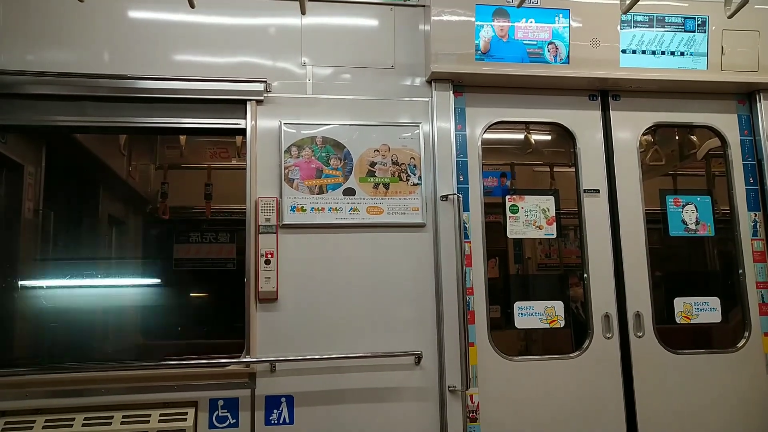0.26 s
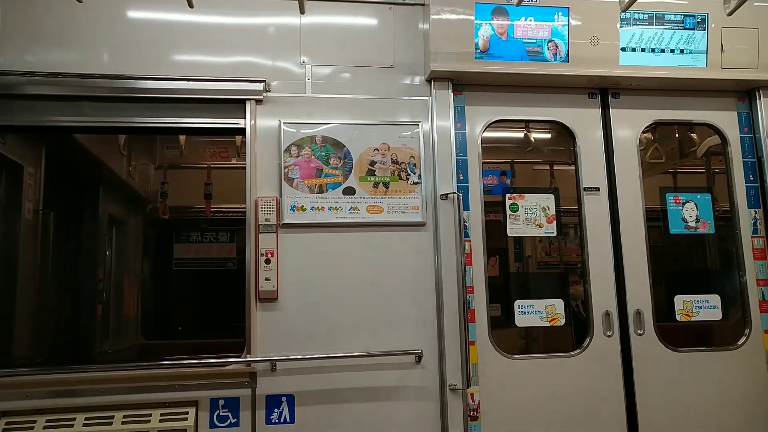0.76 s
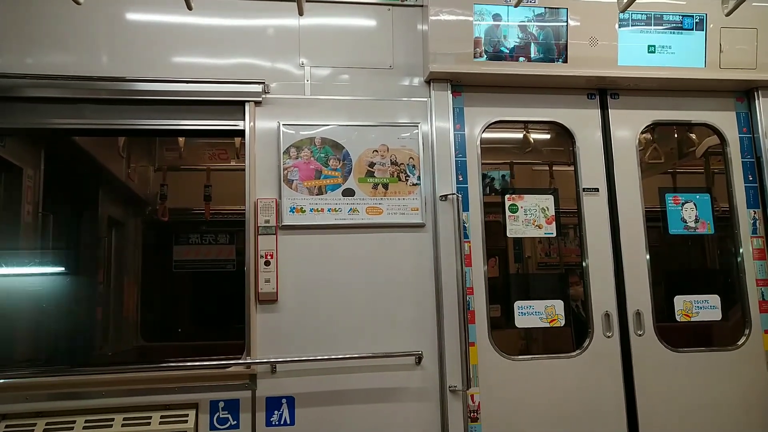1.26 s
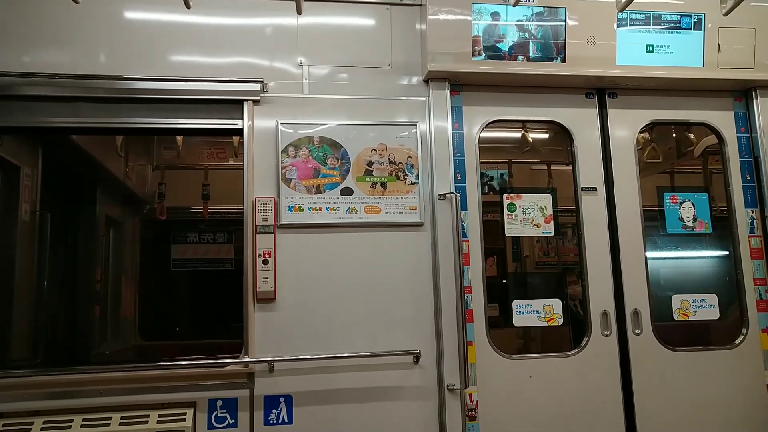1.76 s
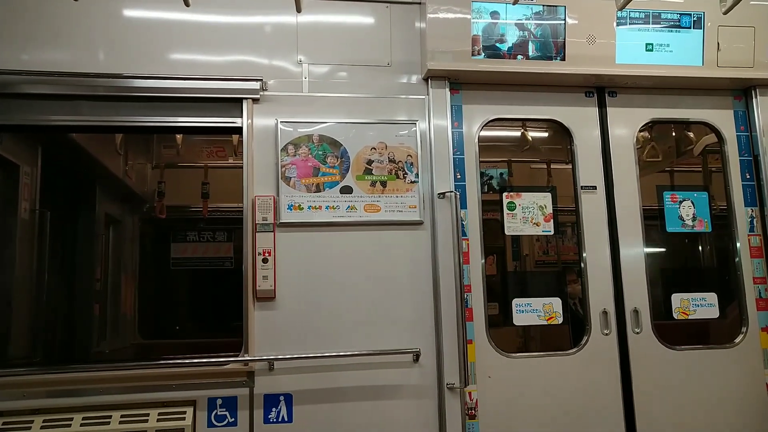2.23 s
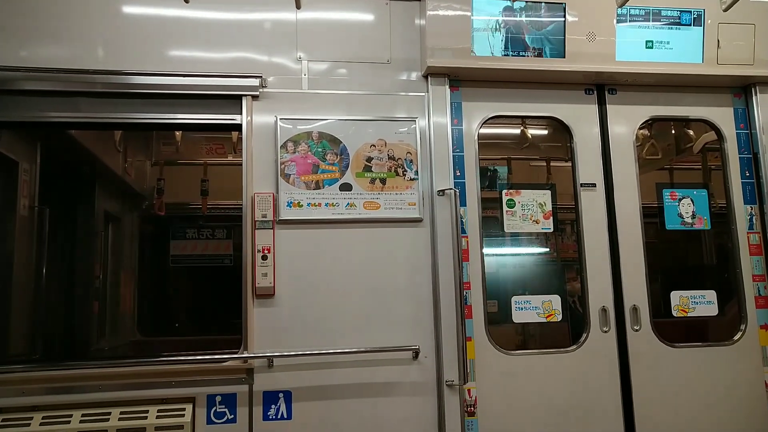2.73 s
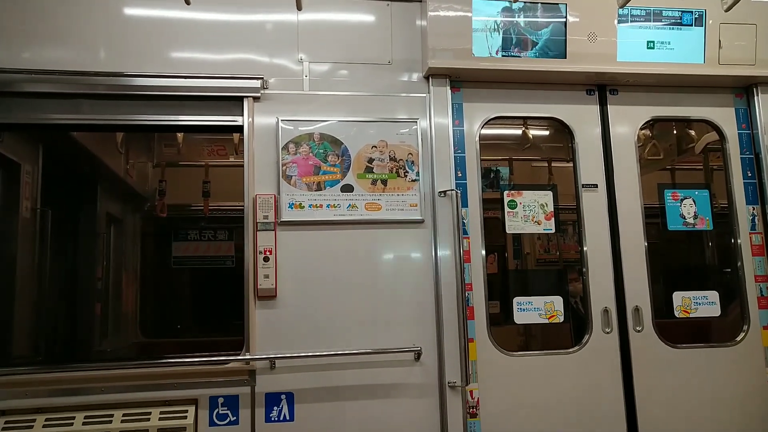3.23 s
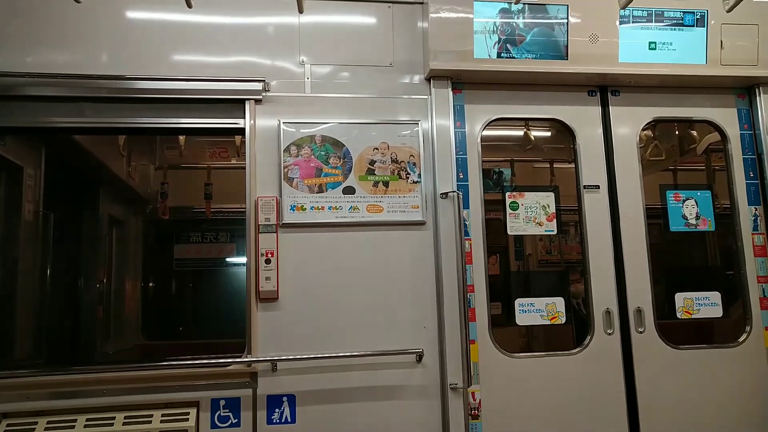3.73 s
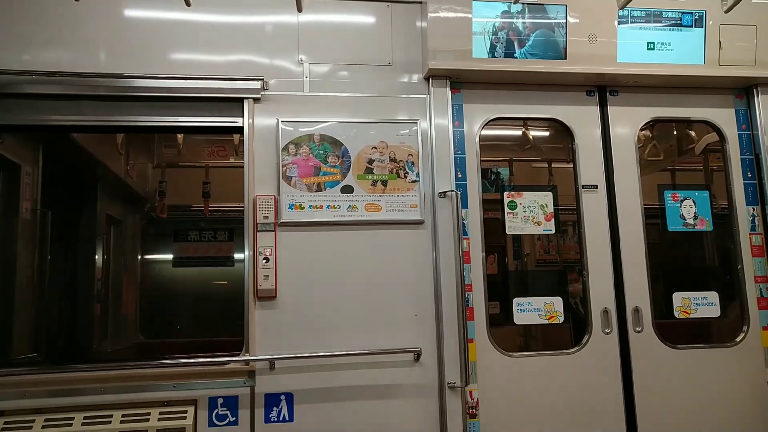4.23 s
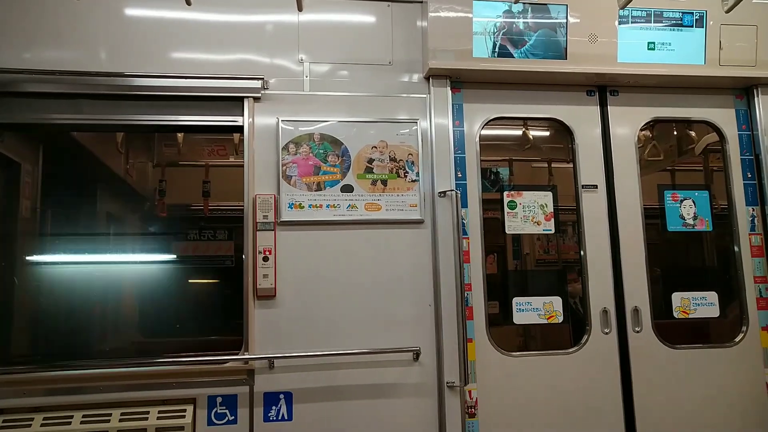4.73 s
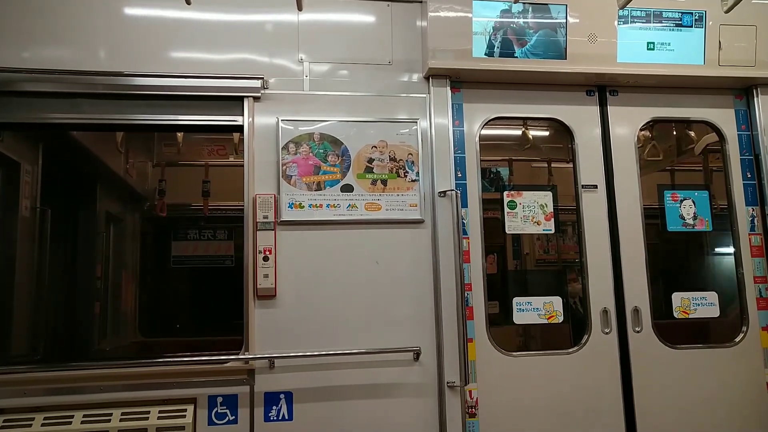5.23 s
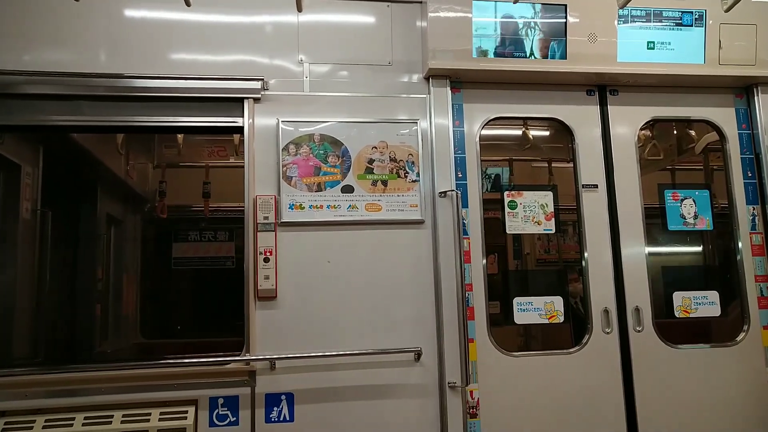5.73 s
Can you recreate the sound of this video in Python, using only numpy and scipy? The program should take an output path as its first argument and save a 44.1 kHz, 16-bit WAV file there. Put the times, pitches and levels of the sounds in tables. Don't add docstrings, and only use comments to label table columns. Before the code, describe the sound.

The interior of an electric train car running through a tunnel, with a continuous dense rumble from start to finish. The opening is rough: floor and panels shake, with dull thumps in the first 0.2 seconds. Then the roll eases, with low boom swelling irregularly, wavering hums from rippled rail, and a broad metallic wheel whir with a faint, drifting ring. Thin tunnel air hisses past the door seals. Scattered soft knocks come around 1.3, 1.9, 2.8 and 3.5 seconds, and a deep body sway swells near 3.6. After about 4.3 the wheel ringing dulls as the car leans into a curve. From 4.8 thumps crowd together, strongest near 5.2, and rattle on to about 5.45. From 5 seconds a wheel flange rubs with a mid-high scraping tone and very faint higher singing. The rumble then eases slightly but continues to the end at 6 seconds. Close, enclosed, small-microphone sound.

```python
import sys
import numpy as np
from scipy import signal
from scipy.fft import rfft, irfft, next_fast_len
from scipy.io import wavfile
from scipy.ndimage import uniform_filter1d

SR = 44100
rng = np.random.default_rng(int(sys.argv[2]) if len(sys.argv) > 2 else 0)


def invert_db(level):
    return 10 ** (np.asarray(level, dtype=float) / 20)


def generate_wav(sig):
    pcm = np.round(np.clip(np.atleast_2d(sig).T, -1, 1) * 32767).astype(np.int16)
    wavfile.write(sys.argv[1], SR, pcm)


N = 263718
T = np.arange(N) / SR

# t/s, excess level/dB
TRACK = [(0, 3), (.2, 3), (.6, 2), (.9, 0), (1.3, 1.5), (2.1, .5), (2.5, 1), (3.5, -0.5), (4.1, 0.5),
         (4.5, 0), (4.7, 0.5), (4.9, 1), (5.07, 2), (5.3, 4), (5.5, 3), (5.7, 1.5), (5.98, 1)]


def rms_one(x):
    return x / np.sqrt(np.mean(x ** 2) + 1e-20)


def in_time(rows):
    inertia_s = 0.13
    s, *columns = np.transpose(rows)
    return [uniform_filter1d(np.interp(T, s, column), round(inertia_s * SR)) for column in columns]


def ramp(start_s, rise_s):
    return np.sin(np.pi / 2 * np.clip((T - start_s) / rise_s, 0, 1)) ** 2


def coloured(spectrum, modes):
    size = next_fast_len(N)
    hz = np.arange(1, size // 2 + 2) * SR / size
    power = np.zeros(len(hz))
    if len(spectrum):
        points_hz, points_db = np.transpose(spectrum)
        colour_db = np.interp(np.log(hz), np.log(points_hz), points_db, left=-150, right=-150)
        power += invert_db(colour_db) ** 2
    for centre_hz, width_hz, db in modes:
        power += invert_db(db) ** 2 / (1 + ((hz - centre_hz) / width_hz) ** 2 * 2) ** 2
    white = rfft(rng.standard_normal(size))
    return rms_one(irfft(white * np.sqrt(power), size)[:N])


def slow_noise(rate_hz):
    lowpass = signal.butter(2, rate_hz, fs=SR, output="sos")
    return rms_one(signal.sosfilt(lowpass, rng.standard_normal(N + SR))[SR:])


def flicker(db, rate_hz):
    return invert_db(db * slow_noise(rate_hz))


def steadied(x):
    window, share = round(0.084 * SR), 0.53
    power = uniform_filter1d(uniform_filter1d(x ** 2, window), window)
    return rms_one(x / np.maximum(power, 1e-3) ** (share / 2))


def moving_band(pitch_hz, centre_hz, half_width_hz):
    phase = 2 * np.pi * np.cumsum(pitch_hz) / SR
    wobble = [coloured([], [(centre_hz, half_width_hz, 0)]) for part in range(2)]
    return wobble[0] * np.sin(phase) + wobble[1] * np.cos(phase)


def rolling():
    # f/Hz, level per Hz/dB
    floor_colour = [(90, -31.5), (125, -11), (150, -5.5), (200, -13), (228, -19), (280, -28.5)]
    panel_colour = [(170, -41), (220, -13.5), (260, -4.5), (400, -10), (520, -10), (620, -18.5), (800, -31)]
    rail_colour = [(450, -29), (600, -6.5), (780, -7), (1000, -8), (1250, -13), (1600, -20.5),
                   (2200, -33.5)]
    # f/Hz, width/Hz, level per Hz/dB
    floor_modes = [(168, 62, -11), (190, 4, -7), (210, 25, -10.5)]
    panel_modes = [(268, 36, -5.5), (292, 37, -7), (331.5, 29, -6), (374.4, 12, -7), (486, 35, -14.5),
                   (569, 31, -13.5)]
    rail_modes = [(699, 12, -5), (734, 25, -7), (820, 18, -2.5), (880, 27, -4), (931, 72, -6),
                  (998, 27, -10), (1080, 23, -11)]
    track_db, = in_time(TRACK)
    floor = invert_db(-31 + 0.46 * track_db) * steadied(coloured(floor_colour, floor_modes))
    panels = invert_db(-30 + 0.97 * track_db) * steadied(coloured(panel_colour, panel_modes))
    rail = invert_db(-34.5 + 0.43 * track_db) * coloured(rail_colour, rail_modes) * flicker(0.32, 3.0)
    return floor + panels + rail


def wheels():
    # f/Hz, level per Hz/dB
    roar_colour = [(1100, -13.5), (1450, -14), (2000, -8.5), (2600, -13.5), (2900, -17.5), (3500, -22.5),
                   (4400, -32), (6000, -57)]
    # f/Hz, width/Hz, level per Hz/dB
    roar_modes = [(1815, 150, -8), (3104, 160, -19), (4020, 300, -26.5)]
    main_mode = [(2240, 150, 1), (2386, 150, 2.5), (2513, 82, -1)]
    growth_db_per_s, lean_damping_db = 0.25, 2.5
    lean = ramp(4.3, 0.6)
    mode_db = -41 + growth_db_per_s * T - lean_damping_db * lean
    roar = invert_db(-38.5) * coloured(roar_colour, roar_modes)
    return roar + invert_db(mode_db) * coloured([], main_mode) * flicker(0.36, 29)


def underframe():
    # f/Hz, level per Hz/dB
    boom_colour = [(40, -28), (60, -4.5), (80, 0.5), (110, 3), (130, -2), (160, -20.5)]
    # t/s, added level/dB
    sways = [(.24, 8), (.87, 4), (1.17, 3), (1.68, 8), (3.3, 9), (5.17, 7), (5.8, 6), (1.92, -5), (4.3, -4),
             (4.46, -5), (3.65, 15), (3.8, 2), (4.13, 9), (4.9, 10.5), (5.3, 2)]
    sway_s = 0.053
    track_db, = in_time(TRACK)
    sway_db = sum(db * np.exp(-((T - s) / sway_s) ** 2) for s, db in sways)
    heave = invert_db(-52.5 + 0.1 * track_db + sway_db) * coloured([], [(49.7, 17, 0)])
    boom = invert_db(-36.5 + 0.89 * track_db + 0.53 * sway_db) * steadied(coloured(boom_colour, []))
    return heave + boom


def wheel_beat():
    turn_hz, wear_db, high_spot_s = 7.3, 0.2, 0.013
    return invert_db(wear_db * np.cos(2 * np.pi * turn_hz * (T - high_spot_s)))


def thumps(blows):
    rise_s, t60_s = 0.005, 0.061
    out, t = np.zeros(N), np.arange(SR // 4) / SR
    rattle_band = signal.butter(4, [300, 950], "band", fs=SR, output="sos")
    rattles = signal.sosfilt(rattle_band, rng.standard_normal((len(blows), len(t))))
    swell = (1 - np.exp(-t / rise_s)) * invert_db(-60 * t / t60_s)
    for (s, db, hz), rattle in zip(blows, rattles):
        blow = invert_db(db - 2.5) * swell * (np.sin(2 * np.pi * hz * t) + invert_db(2.0) * rattle)
        at = round(s * SR)
        out[at:at + len(t)] += blow[:N - at]
    return out


def rail_blows():
    # t/s, peak level/dB, floor pitch f/Hz
    joints = [(0.018, -12, 169), (0.141, -7.5, 153), (0.933, -23, 181), (1.319, -9.5, 180),
              (2.294, -19, 299), (2.765, -14, 328), (2.823, -8, 179.7), (3.138, -14, 189),
              (3.479, -10.5, 128), (3.599, -15, 128.5), (3.901, -11.5, 183), (4.767, -10, 300.6),
              (4.891, -9, 147), (4.919, -8.5, 220), (5.002, -6.5, 283), (5.144, -9, 148), (5.175, -1, 191),
              (5.21, -10, 337), (5.277, -7, 197), (5.317, -9, 286), (5.359, -7.5, 314), (5.444, -13, 241)]
    more_joints = [(.066, -14, 170), (.187, -7.5, 165), (.224, -20, 150), (1.398, -14, 374),
                   (1.542, -16, 153), (1.587, -20, 175), (1.802, -19, 307), (1.935, -8, 172),
                   (2.504, -16, 342), (2.65, -16, 170), (2.697, -18, 183), (2.884, -18, 350),
                   (2.922, -11, 167), (3.095, -12.5, 288), (3.194, -15, 170), (3.98, -21, 183),
                   (4.284, -12, 161), (4.369, -23, 188), (4.855, -9, 120), (5.152, -5, 167),
                   (5.163, -14, 418), (5.182, -15, 527), (5.262, -16, 140)]
    return thumps(joints) + thumps(more_joints)


def ripples():
    # middle t/s, length/s, f/Hz, rms level/dB
    stretches = [(.25, 0.5, 166, -37), (.45, 0.26, 820, -39.5), (.5, .3, 213.8, -33), (.55, 0.39, 375, -39),
                 (.9, .4, 181, -33), (.9, 0.34, 876, -41.5), (1.3, 0.38, 820, -39), (1.4, 0.48, 170, -38),
                 (1.55, 0.32, 262, -35), (1.8, 0.43, 814, -39.5), (1.85, 0.34, 847, -42),
                 (1.9, .5, 168, -36.5), (1.9, 0.48, 304, -38.5), (2.1, 0.38, 151, -34.5),
                 (2.1, 0.44, 890, -42), (2.3, 0.52, 297, -40), (2.65, 0.37, 972, -43.5),
                 (2.85, 0.51, 144, -36), (3.1, .45, 190, -38), (3.15, .4, 820, -43),
                 (3.35, 0.69, 300.3, -35.5), (3.9, 0.41, 890, -43), (4.0, .4, 184.3, -37.5),
                 (4.1, 0.39, 802, -41), (4.15, .35, 291, -40), (4.55, 0.53, 152.1, -38.5),
                 (4.95, 0.49, 820, -41.5), (5.0, .6, 710, -42.5), (5.0, .3, 292, -33.5),
                 (5.33, .25, 300, -31.5), (4.65, .2, 301.4, -37), (2.9, .15, 351, -37), (4.9, .2, 500, -36),
                 (5.58, 0.193, 550, -36.5), (5.17, 0.095, 797, -42), (5.18, .1, 586, -45),
                 (5.21, .12, 332, -31), (4.84, .15, 344.6, -32.5), (5.3, 0.25, 877, -51),
                 (5.35, 0.44, 820, -46), (5.85, .3, 278.2, -36.5), (1.75, .25, 290, -37)]
    pitch_share = 0.0209
    out = np.zeros(N)
    wander = slow_noise(9)
    broken = rms_one(flicker(2.5, 21))
    for k, (s, length_s, hz, db) in enumerate(stretches):
        start = max(round((s - length_s / 2) * SR), 0)
        stop = min(round((s + length_s / 2) * SR), N)
        at = np.arange(start, stop)
        swell = np.cos(np.pi * (at / SR - s) / length_s) * np.roll(broken, k * SR // 5)[at]
        pitch_hz = hz * (1 + pitch_share * np.roll(wander, k * SR // 3)[at])
        out[at] += invert_db(db + 4.5) * swell * np.sin(2 * np.pi * np.cumsum(pitch_hz) / SR)
    return out


def wheel_song():
    # t/s, centre f/Hz, level/dB
    drift = [(0, 2330, -50), (.5, 2336, -47), (1.0, 2400, -51), (1.3, 2345, -46.5), (1.8, 2394, -46.5),
             (2.3, 2360, -52), (2.8, 2415, -49), (3.3, 2423, -48.5), (3.7, 2345, -48), (4.2, 2390, -48),
             (4.7, 2353, -53), (5.1, 2370, -61), (5.98, 2370, -61.5)]
    width_hz = 98
    centre_hz, db = in_time(drift)
    return invert_db(db) * moving_band(centre_hz, 0.9, width_hz / 2) * flicker(2.8, 12.0)


def flange():
    # f/Hz, width/Hz, level per Hz/dB
    low_modes = [(1515, 130, 3), (1500, 60, -12)]
    middle_modes = [(3370, 160, -2), (3670, 220, 0), (4600, 250, -15.5), (5170, 90, -9)]
    # t/s, rise/s, full level/dB
    rubbing = [
        (4.98, 0.14, -45),
        (5.098, 0.5, -54),
        (5.15, 0.35, -65.5),
    ]
    high_hz, sag_hz, high_width_hz = 4950, 90, 150
    low_gain, middle_gain, high_gain = [invert_db(db) * ramp(s, rise_s) for s, rise_s, db in rubbing]
    high_start_s, high_rise_s, _ = rubbing[-1]
    pitch_hz = high_hz - sag_hz * ramp(high_start_s, high_rise_s)
    high = moving_band(pitch_hz, 0.88, high_width_hz / 2)
    low, middle = coloured([], low_modes), coloured([], middle_modes)
    return low_gain * low + middle_gain * middle + high_gain * high


def door_seals():
    # f/Hz, level per Hz/dB
    air_colour = [(3500, -30), (4600, -2), (5500, -1), (7300, 2), (7700, -1.5), (8000, -15.5), (8400, -24),
                  (8620, -54)]
    # f/Hz, width/Hz, level per Hz/dB
    air_modes = [(5920, 110, -1)]
    # t/s, hiss level/dB
    draught = [(0, -60), (1.0, -59.5), (1.25, -61.5), (1.6, -60.5), (3.3, -61), (3.85, -64), (4.3, -62.5),
               (4.7, -59), (5.35, -58), (5.47, -60.5), (5.65, -60), (5.98, -58)]
    hiss_db, = in_time(draught)
    return invert_db(hiss_db + 1.5) * coloured(air_colour, air_modes) * flicker(0.36, 14)


def scene():
    running = wheel_beat() * (rolling() + wheels() + underframe())
    track_events = rail_blows() + ripples()
    return (running + track_events + wheel_song() + flange() + door_seals())[None]


def top_cut(x):
    return signal.sosfilt(signal.butter(12, 8930, fs=SR, output="sos"), x)


def record(dry):
    bass_cut = signal.butter(4, 38, "high", fs=SR, output="sos")
    top_edge = signal.ellip(10, 0.5, 25, 8520, fs=SR, output="sos")
    x = signal.sosfilt(bass_cut, dry)
    x = signal.sosfilt(top_edge, x)
    return top_cut(x)


dry = scene()
out = record(dry)
generate_wav(out)
```